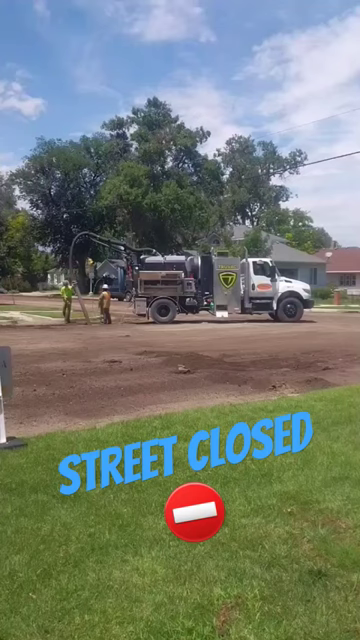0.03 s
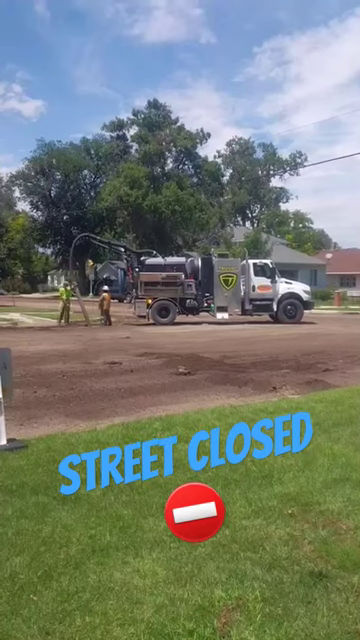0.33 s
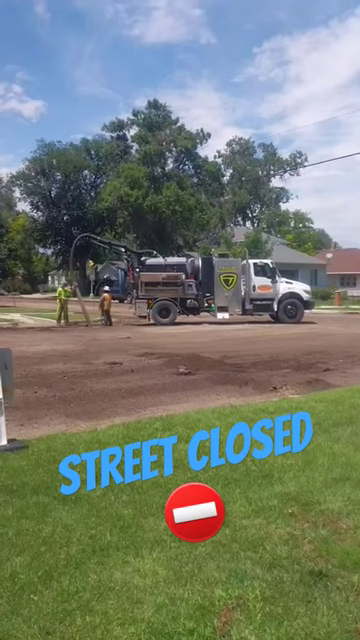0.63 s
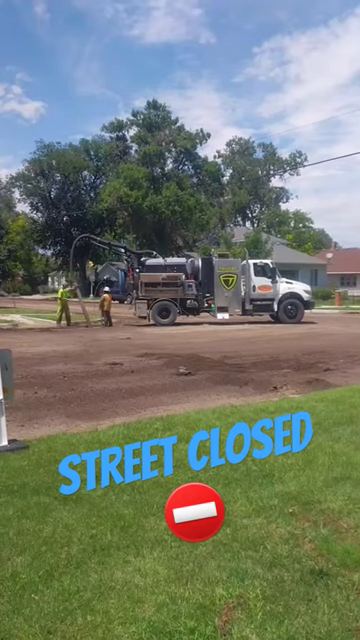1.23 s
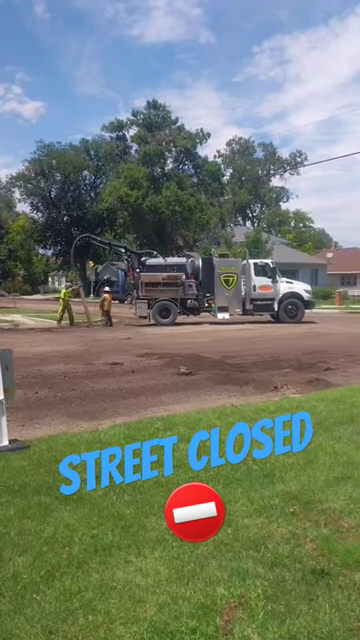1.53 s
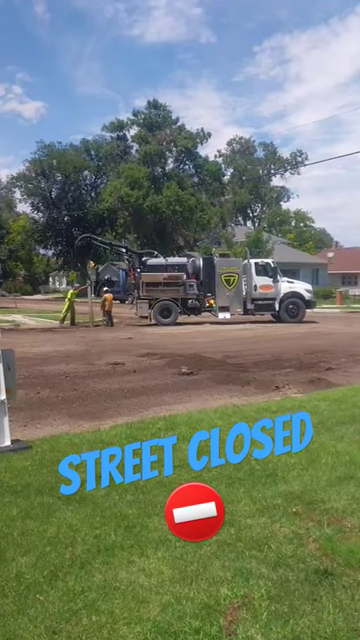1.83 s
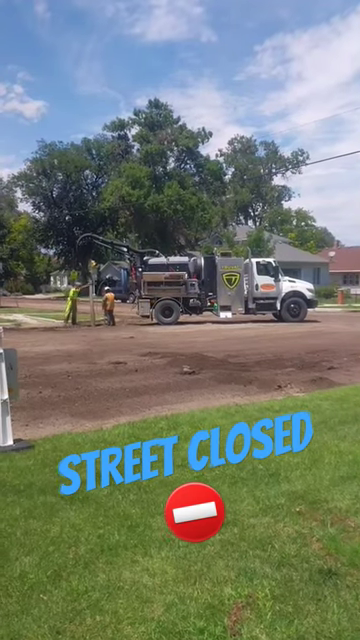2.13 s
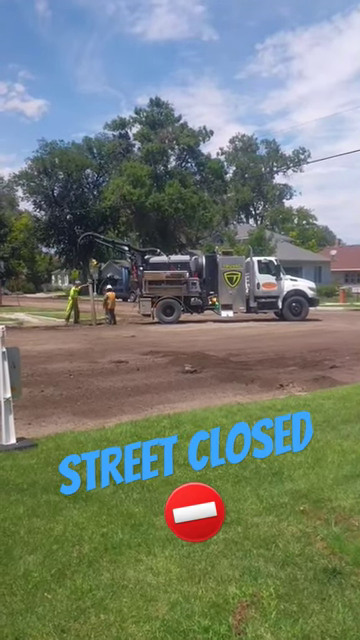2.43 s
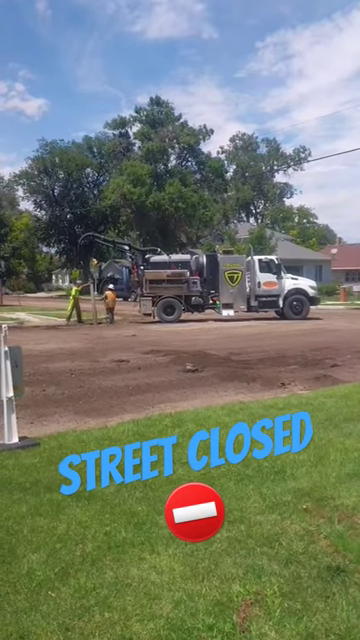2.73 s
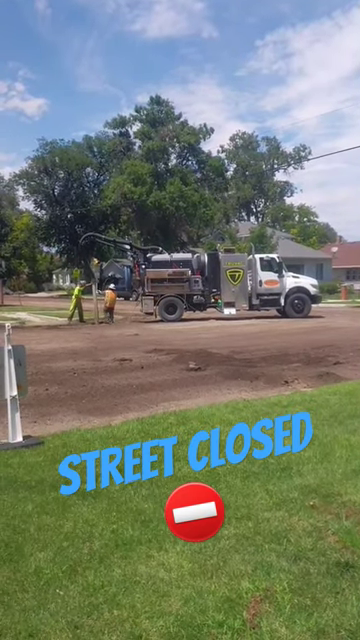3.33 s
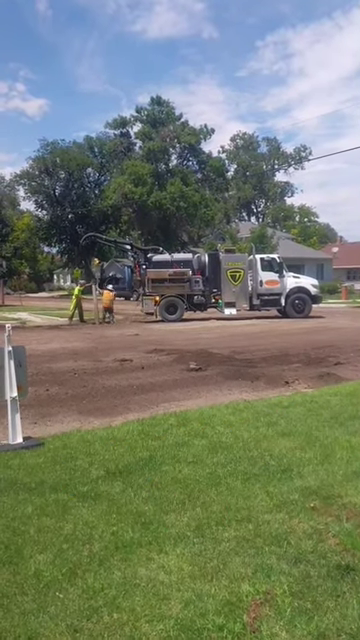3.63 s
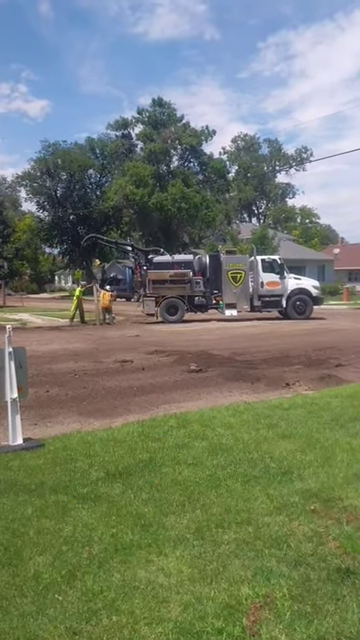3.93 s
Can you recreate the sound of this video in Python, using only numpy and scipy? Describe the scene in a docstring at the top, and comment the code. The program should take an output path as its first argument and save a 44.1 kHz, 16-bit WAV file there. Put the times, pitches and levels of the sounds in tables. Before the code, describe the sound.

A vacuum excavation truck roars steadily outdoors, its diesel engine booming under a blower's hum.

```python
"""A deep engine boom and a steady hum cut in abruptly: a vacuum excavation truck across a street.
The diesel fires into a booming exhaust and clatters. The spinning blower hums a note that sags
and rises near the end. Air and spray hiss through the suction hose, whose mouth roars and whose
tube rings, and a pump whines thinly. It is all heard from a lawn."""
import sys
import numpy as np
from scipy import signal
from scipy.fft import rfft, irfft, next_fast_len
from scipy.io import wavfile
from scipy.ndimage import uniform_filter1d, map_coordinates

SR = 44100
rng = np.random.default_rng(int(sys.argv[2]) if len(sys.argv) > 2 else 0)


def digitize_waveform(pressure):
    """Quantize a signal to 16-bit integers and store it at the path in sys.argv[1].

    Rows of a 2-D input are taken as channels; values are limited to [-1, 1].
    """
    field = np.atleast_2d(pressure).T
    bounded = np.clip(field, -1, 1)
    quanta = np.round(bounded * 32767).astype(np.int16)
    wavfile.write(sys.argv[1], SR, quanta)


N = 176400
T = np.arange(N) / SR


def engine():
    """The diesel's firings make low tones, and its exhaust boom and clatter pulse in time with them."""
    # Each row: time in seconds, level in dB. The throb is the tone at the firing rate.
    throb_levels = [(.2, -45), (.7, -39), (1.2, -39), (1.65, -34), (2.2, -38), (2.4, -53), (2.68, -38),
                    (3.0, -52), (4, -54)]
    boom_levels = [(.2, -20), (.6, -20), (1.15, -18.5), (1.45, -20.5), (1.85, -21.5), (2.2, -18),
                   (2.55, -21.5), (2.85, -19), (3.35, -21.5), (4, -19.5)]
    # Each row: multiple of the firing rate, level in dB.
    overtones = [(2, -33.5), (4, -32)]
    # Each row: frequency in Hz, relative strength of the noise there in dB.
    boom_spectrum = [(20, -30), (32, -27), (48, -14.5), (88, -12.5), (104, -1.5), (122, -1.4), (142, -5),
                     (165, -2.5), (210, 0.5), (255, .5), (284, -2), (316, 1), (338, -2), (368, -13),
                     (430, -21), (600, -49), (1500, -87)]
    clatter_spectrum = [(200, -5), (450, 0), (570, -2), (760, 0.5), (950, -2.5), (1100, -7), (1500, -7),
                        (1750, -14), (1950, -9), (2100, -14.5), (2750, -14), (3300, -20), (8000, -65)]
    firing = spin(hz=63.34, jitter=0.0044)
    throb = tone(firing, curves(throb_levels)[0])
    drone = sum(tone(multiple * firing, db) for multiple, db in overtones)
    boom = amp(curves(boom_levels)[0]) * rush(boom_spectrum, patchy_db=-0.43)
    clatter = amp(-32.5 + 0.37 * wobble(18)) * rush(clatter_spectrum, patchy_db=1.0)
    beat = np.cos(firing)
    return throb + drone + boom * (1 + 0.16 * beat) + clatter * (1 + 0.079 * beat)


def blower():
    """The vacuum blower hums a note whose pitch and overtones follow the speed of its rotor."""
    # Each row: time in seconds, pitch in Hz.
    pitches = [(.2, 405.4), (1.3, 405.6), (1.65, 404.3), (2.0, 403.6), (2.66, 404.4), (2.82, 402.4),
               (3.0, 399), (3.25, 401.3), (3.6, 404.1), (3.76, 407.7), (4, 407.6)]
    # Each row: time in seconds, then the levels of the note and its octave in dB, before a small trim.
    levels = [(.2, -26, -51), (.8, -26.8, -41.5), (1.5, -26.5, -45.5), (1.7, -24, -36), (1.85, -27, -41),
              (2.0, -26, -36.5), (2.3, -25.5, -37), (2.5, -25.5, -42), (2.65, -29, -45), (2.84, -24.5, -36),
              (2.94, -26.5, -32.5), (3.03, -27, -37), (3.3, -24, -39), (3.63, -30.5, -49),
              (3.8, -31, -34.5), (4, -33, -37.5)]
    # Each row: multiple of the pitch, level in dB.
    overtones = [(3, -55.5), (4, -57.5)]
    flutter_db = 0.5
    phase = spin(curves(pitches)[0], jitter=0.0005)
    note_db, octave_db = curves(levels)
    upper = sum(tone(multiple * phase, db, flutter_db) for multiple, db in overtones)
    note = tone(phase, note_db - 0.08, flutter_db)
    octave = tone(2 * phase, octave_db - 0.4, flutter_db)
    return note + octave + upper


def suction():
    """Swirling air and fine spray hiss at the hose; the flow makes its mouth roar and its tube ring."""
    # Each row: frequency in Hz, relative strength of the noise there in dB.
    hiss_spectrum = [(800, 2), (2800, -2.5), (3800, -0.5), (4150, -0.5), (5050, 2), (5550, 1), (6000, -1.5),
                     (6550, 2), (7100, -4.5), (7700, -10), (8350, -25), (10000, -50)]
    spray_spectrum = [(6000, -50), (8400, -18.5), (9000, -5.5), (9600, -1), (11000, 0), (12400, 2.5),
                      (14000, -1.5), (14700, -15), (15300, -14)]
    tube_spectrum = [(1500, -29), (2120, -7), (2330, -3), (2500, 3), (2600, -5), (2720, -12.5), (3200, -45)]
    mouth_spectrum = [(850, -32), (1120, -1), (1280, -0.5), (1480, -0.5), (1620, -3.5), (1760, -16),
                      (1950, -4), (2300, -36)]
    # Each row: time in seconds, then the levels of hiss and spray in dB, before a small boost.
    flow_levels = [(0.22, -38, -43.5), (0.29, -38.5, -43.5), (0.33, -36.5, -42.5), (0.6, -40.5, -47.5),
                   (1.07, -39.5, -45.5), (2.76, -41.3, -48), (3.01, -40, -46), (3.41, -40.5, -48),
                   (3.93, -41, -46), (4.0, -40.5, -45)]
    # Each row: time in seconds, level in dB.
    tube_levels = [(.2, -43), (.7, -43), (1.1, -43), (1.45, -43), (1.75, -43), (2.3, -45), (2.9, -46),
                   (3.4, -48.5), (4, -46)]
    mouth_levels = [(.2, -43), (.45, -41), (.9, -42.5), (1.4, -46), (2.2, -46), (3.0, -50.5), (4, -45)]
    hiss_db, spray_db = curves(flow_levels)
    flutter = amp(0.38 * wobble(15))  # shared by all four sounds
    hiss = amp(hiss_db + 2.5 + 0.13 * wobble(7.4)) * rush(hiss_spectrum, patchy_db=1.28)
    spray = amp(spray_db + 0.7 + 0.44 * wobble(6.5)) * rush(spray_spectrum, patchy_db=2.1)
    ring = amp(curves(tube_levels)[0]) * rush(tube_spectrum, patchy_db=2)
    roar = amp(curves(mouth_levels)[0]) * rush(mouth_spectrum, patchy_db=2.5)
    return flutter * (hiss + spray + ring + roar)


def pump():
    """The turning pump and its gears give off thin, high whines."""
    # Each row: multiple of the pump's base pitch, level in dB.
    overtones = [(3, -57), (4, -66), (5, -58), (6, -53), (7, -71), (8, -65)]
    # Each row: pitch in Hz, level in dB.
    gear_whines = [(2151, -73), (2436, -60.5), (2500, -55), (2598, -60), (4986, -63), (9673, -67)]
    base_hz, jitter = 370.4, 0.00068
    phase = spin(base_hz, jitter)
    whine = sum(tone(multiple * phase, db) for multiple, db in overtones)
    gears = sum(tone(spin(hz, jitter), db) for hz, db in gear_whines)
    return whine + gears


def reflections(x, count, echo_db=-18.5, latest_s=0.025):
    """Weak, quick echoes off the truck and the street add a faint ring to a sound."""
    delays = rng.uniform(.1, 1, count) * latest_s
    echoes = lambda hz: 1 + amp(echo_db) * sum(np.exp(-2j * np.pi * hz * s) for s in delays)
    return filtered(x, echoes) / np.sqrt(1 + count * amp(echo_db) ** 2)


def rush(spectrum, patchy_db):
    """Rushing stereo noise with brief louder and softer patches, centred in the bass, wide up high."""
    # Each row: frequency in Hz, how alike left and right are (1 means identical).
    likeness = [(30, 0.63), (60, 0.9), (130, 1), (330, 0.96), (640, 1), (1400, 0.84), (2000, 0.49),
                (2400, 0.77), (3000, .42), (3600, 0.28), (5000, 0.67), (6700, 0.55), (10000, 0.27),
                (14800, .2)]
    cells = signal.stft(rng.standard_normal((2, N)), nperseg=1024)[2]  # noise split by pitch and time
    patches = uniform_filter1d(rng.standard_normal(cells.shape[1:]), size=5, axis=0)
    patches = uniform_filter1d(patches, size=6, axis=1)
    noise = signal.istft(cells * amp(patchy_db * unit(patches)), nperseg=1024)[1][:, :N]

    def colour(hz):
        width = np.arccos(np.clip(along(likeness, hz), -1, 1)) / 2
        return amp(along(spectrum, hz)) * [np.cos(width), np.sin(width)]
    mid, side = filtered(noise, colour)
    return np.array([mid + side, mid - side]) / mid.std()


def spin(hz, jitter):
    """The angle (phase) of a turning part whose speed wanders by the fraction jitter."""
    speed = hz * (1 + jitter * wobble(12))
    return 2 * np.pi * (np.cumsum(speed) / SR + rng.random())


def tone(phase, db, waver_db=2):
    """A pure tone whose level wavers in the outdoor air."""
    return np.sqrt(2) * amp(db + waver_db * wobble(6.15)) * np.sin(phase)


def wobble(rate):
    """A smooth curve through rate random values a second."""
    return map_coordinates(rng.standard_normal(int(N * rate / SR) + 4), [T * rate])


def curves(rows):
    """Draw lines between timed rows: one curve for each column after the time."""
    seconds, *columns = np.transpose(rows)
    return [np.interp(T, seconds, column) for column in columns]


def along(rows, hz):
    """Read between rows of frequency and value, with octaves evenly spaced."""
    frequencies, values = np.transpose(rows)
    return np.interp(np.log(hz + 1), np.log(frequencies + 1), values)


def filtered(x, response):
    """Multiply each frequency in x by response(hz)."""
    size = next_fast_len(N + SR // 2)
    return irfft(rfft(x, size) * response(np.fft.rfftfreq(size, 1 / SR)), size)[..., :N]


def amp(db):
    """Turn decibels into a multiplier."""
    return 10 ** (np.asarray(db) / 20)


def unit(x):
    """Scale x to a typical size (rms) of 1."""
    return x / np.sqrt(np.mean(x ** 2) + 1e-20)


def scene():
    """All parts of the truck run at once."""
    return engine() + blower() + pump() + reflections(suction(), count=6)


def record(dry):
    """Two microphone openings each colour the sound; it cuts in, minus deep bass and the top treble."""
    # Each row: frequency in Hz, left level minus right level in dB.
    balance = [(60, -1), (140, -1.5), (210, -2.5), (330, -4.5), (480, -6.5), (760, 3), (1170, -1),
               (1600, -0.5), (1900, -7), (2150, -1.5), (2500, -8), (2950, -2), (3600, 1.5), (4900, -3),
               (6000, 0), (6600, 2), (8500, -6), (9700, -2), (12400, -6), (14000, -4.5), (14700, 2)]
    # Each row: frequency in Hz, how far the left wave runs ahead of the right in radians.
    left_lead = [(330, 0), (600, 0.85), (850, 0), (1150, 0.66), (1400, 0.4), (1800, 0.2), (2020, 0.96),
                 (2280, 0.3), (2600, .5), (2900, 2), (3400, 1), (3700, 0.5), (4300, -1.5), (5500, 1.24),
                 (7300, 0), (9000, -4), (10000, 1.2), (12500, .8), (14200, 2.2)]
    start_s, rise_s = 0.185, 0.0037
    low_cut_hz, high_cut_hz = 49.5, 15400
    sides = np.array([[.5], [-.5]])  # left, right

    def openings(hz):
        gains = amp(along(balance, hz) * sides)
        low_cut = (hz / low_cut_hz) ** 2 / np.hypot(1, (hz / low_cut_hz) ** 2)
        phase_shift = np.exp(1j * along(left_lead, hz) * sides)
        return low_cut * gains / gains.mean(axis=0) * phase_shift
    cut_in = np.clip((T - start_s) / rise_s, 0, 1)
    heard = filtered(dry, openings) * cut_in
    return filtered(heard, lambda hz: 1 / np.hypot(1, (hz / high_cut_hz) ** 200))


dry = scene()
out = record(dry)
digitize_waveform(out)
```